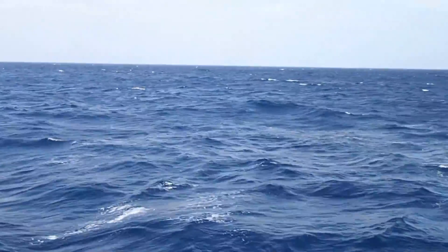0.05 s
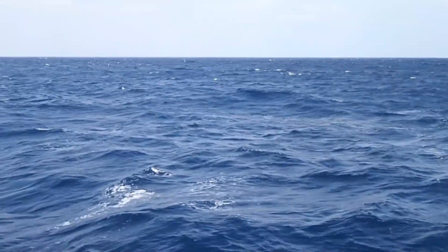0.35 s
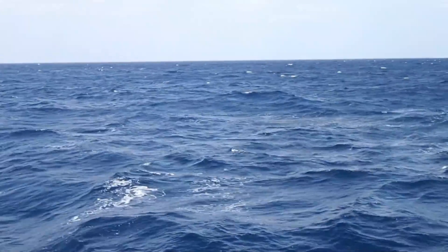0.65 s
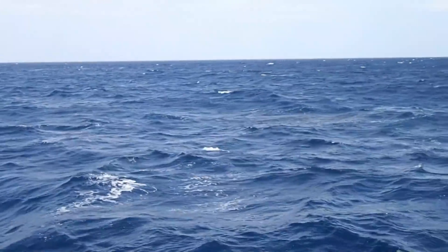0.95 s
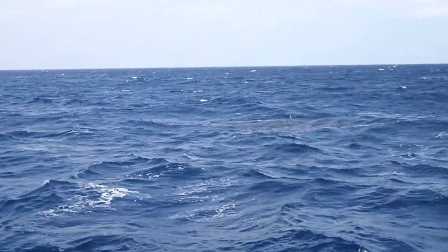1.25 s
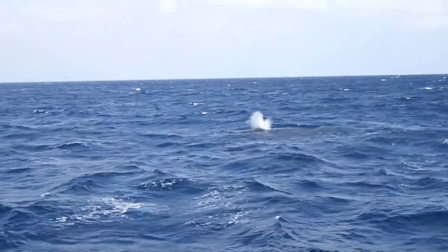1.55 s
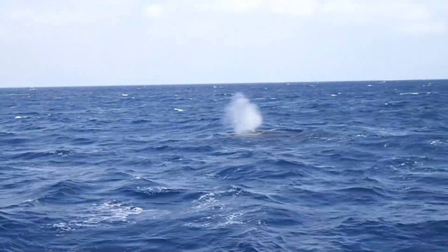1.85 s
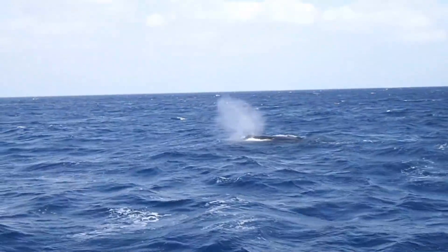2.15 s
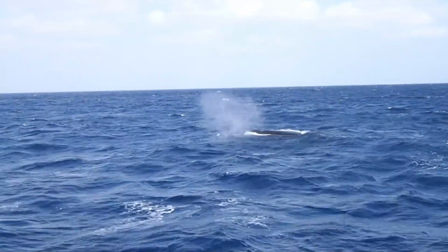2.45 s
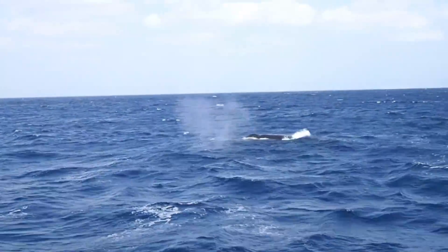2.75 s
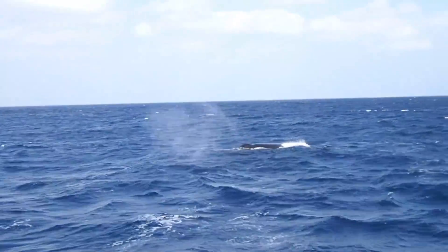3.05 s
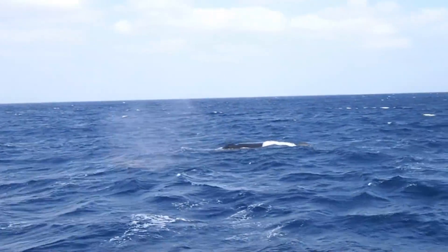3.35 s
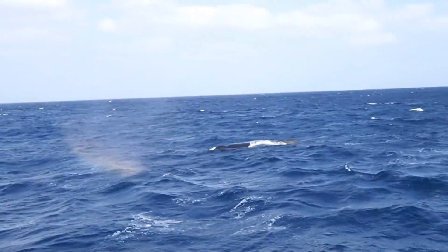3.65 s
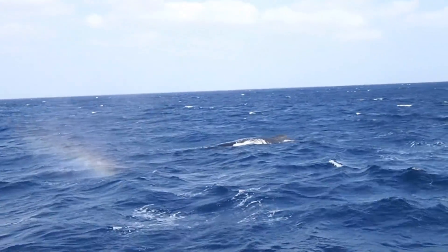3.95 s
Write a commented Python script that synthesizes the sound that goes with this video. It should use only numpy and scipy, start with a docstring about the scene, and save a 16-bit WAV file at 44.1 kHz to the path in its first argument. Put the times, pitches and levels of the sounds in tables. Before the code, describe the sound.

Gusty wind buffets the microphone on a boat at sea. Foam hisses close by in fading surges over a faint engine rumble, and near the middle a whale blows once, some way off, with a breathy whoosh.

```python
"""Wind and a whale from the deck

On a boat in open sea, wind buffets the two microphone ports, each in its own way, over a faint engine.
Close by, foam hisses beside the hull in dying surges; some way off, a whale blows once.
The microphone housing makes the hiss ring near 5 kHz, and a limiter ducks everything
at the hardest buffets."""
import sys
import numpy as np
from scipy import signal
from scipy.fft import rfft, irfft
from scipy.io import wavfile
from scipy.ndimage import uniform_filter1d, minimum_filter1d

SR = 44100
rng = np.random.default_rng(int(sys.argv[2]) if len(sys.argv) > 2 else 0)


def generate_wav(signal):
    """Clip the signal to [-1, 1] and save it as 16-bit WAV at the path in sys.argv[1]."""
    frames = np.transpose(np.atleast_2d(signal))
    scaled = np.clip(frames, -1, 1) * 32767
    pcm = np.round(scaled).astype(np.int16)
    wavfile.write(sys.argv[1], SR, pcm)


N = 176400

# wind strength at each microphone port: (time [s], level [dB, before GUST_DEPTH and band steepness])
GUST_LEFT = [(0.0, -5), (0.14, 0), (0.28, -2.5), (0.39, 3), (0.58, -16.5), (0.61, 0), (0.76, -3),
             (0.81, -4.5), (1.0, 3), (1.05, -3.5), (1.13, 4.5), (1.18, -3), (1.43, 0.5), (1.55, -2.5),
             (1.79, -0.5), (1.88, -7), (2.13, 3), (2.26, -0.5), (2.42, 1.2), (2.55, -2.8), (3.08, 0),
             (3.47, -4), (3.5, -9), (3.67, -2), (3.73, -6.5), (4.0, -2.2)]
GUST_RIGHT = [(0.0, 0), (0.2, -9), (0.23, 4.5), (0.58, -7), (0.76, 6), (0.88, -2.5), (0.93, 2),
              (1.45, -4.2), (1.5, 3.5), (1.63, -2), (1.81, 2.3), (1.89, -4), (2.0, 4), (2.15, 4), (2.2, 0),
              (2.5, 0), (2.66, -1), (2.71, 2.2), (2.88, -4), (3.08, 3.5), (3.16, -6.5), (3.38, 2.5),
              (3.49, -2.5), (3.8, -1.2), (3.84, -5), (4.0, -7)]
# turbulence on a port, before gusts and port gain: (frequency [Hz], density [dB per Hz])
WIND_SPECTRUM = [(20, -71), (30, -67), (55, -50), (100, -42.5), (170, -40.5), (300, -47), (500, -57),
                 (800, -68), (1400, -86.5), (3000, -112), (8000, -135)]
GUST_DEPTH, STEEPEN_PER_OCTAVE = 0.86, 0.44   # higher bands follow the gusts more steeply
EDDY_PER_S, EDDY_DEPTH, FLUTTER_PER_S, FLUTTER_DB = 28, 1.99, 15, 1.0

# surges of foam beside the hull, and swells of the engine under the deck: (time [s], level [dB])
WASH_LEVEL = [(0, 0.5), (.06, 3), (.14, 3), (.33, -1.9), (.46, -8.5), (.57, -5.5), (.66, -.5), (.74, -1),
              (.82, -9), (.99, -2.5), (1.22, -12), (1.53, -13.5), (2.28, -15), (2.55, -31), (2.68, -10.5),
              (2.83, -10), (3.1, -18), (3.28, -16), (3.48, -22), (3.66, -14.5), (4, -14.5)]
ENGINE_LEVEL = [(0, 6), (.9, -2), (1.4, -5), (1.7, -14), (2.05, 3), (2.8, 3.5), (3.25, -4), (3.9, 7)]
FOAM_GRAIN_DB, FOAM_GRAINS_PER_S = 1.44, 140
DROPS_PER_S, DROP_SPREAD_DB, DROP_DB = 500, 2, -11

# base spectra of foam, sea, engine and whale spray, ahead of the housing:
# (frequency [Hz], density [dB per Hz])
FOAM_SPECTRUM = [(200, -70), (600, -68.5), (1100, -69), (1550, -71.5), (2000, -75.5), (2700, -84.5),
                 (4000, -89), (9000, -87), (11000, -92), (15500, -93)]
SEA_SPECTRUM = [(200, -67), (600, -71.5), (1100, -80.5), (1550, -82), (2200, -95), (4000, -102),
                (9000, -108), (12000, -110), (15500, -110)]
ENGINE_SPECTRUM = [(20, -72), (40, -59.5), (53, -50), (68, -72), (110, -55), (250, -64.5), (600, -82),
                   (2000, -130)]
SPRAY_SPECTRUM = [(600, -71.5), (1500, -75.5), (2200, -85), (3100, -87), (4100, -94), (5400, -89.5),
                  (6600, -92.5), (8200, -90.5), (11000, -95), (15500, -99)]
# how alike each arrives at the two ports: (frequency [Hz], correlation [-1 to 1])
FOAM_LIKENESS = [(500, .97), (2000, 1), (3800, 1), (5300, 0.88), (7000, 0.62), (10000, 0.78), (14000, .5)]
SEA_LIKENESS = [(500, 1), (2000, 1), (3800, 1), (5500, 0.31), (8000, .2), (13000, -0.62)]
ENGINE_LIKENESS = [(30, 0.61), (200, 0.67)]
SPRAY_LIKENESS = [(4000, .997), (8000, 0.94), (14000, 1)]

# hard eddies striking the ports:
# (time [s], level [dB], pitch [Hz], left over right [dB], relative edge level [dB, before EDGE_DB])
BUFFETS = [(.149, -2, 142, 12, -14), (.238, -2.5, 168, -11.5, -14), (0.372, -4, 324, -9, -21),
           (0.403, -7, 400, 18, -4), (0.73, -6.5, 167, 9, -18), (.759, -2.5, 277, -5, -13),
           (.767, -3.5, 240, 2, -18), (.945, -3.5, 315, 15, -15), (1.010, -2, 217, 24, -16),
           (1.121, -15, 241, 12, -10), (1.175, -9.5, 190, -12, -8.5), (1.306, -17.5, 400, -10, -1.5),
           (1.338, -11.5, 228, 0, -9), (1.445, -12, 320, 25, 1), (1.517, -2, 196, 29, -20),
           (1.816, -2, 177, -32, -27), (1.95, -9, 183, 8, -8.5), (2.086, -8, 262, 2, -13),
           (2.137, -2.5, 260, 6, -9), (2.235, -2, 214, 18, -9), (2.366, -9, 202, 1, -12),
           (2.490, -12, 454, -10, -6), (2.653, -15, 330, 9, -3), (2.680, -5, 192, 10, -13.5),
           (2.853, -13, 170, -21, -11), (2.865, -2, 185, 25, -14), (2.979, -5, 170, 6.5, -26),
           (3.019, -7, 328, 10, -9.5), (3.085, -3.5, 337, 20, -10), (3.244, -14, 304, 6, -13),
           (3.388, -16, 228, -20, -22), (3.416, -10, 285, 12, -3.5), (3.457, -2, 198, 18, -22),
           (3.465, -1, 200, 24, -13), (3.587, -6, 293, 14, -12), (3.628, -11.5, 206, 19, -9),
           (3.668, -12.5, 260, 5, -4.5), (3.770, -1, 154, 15, -16), (3.922, -8, 148, 16, -20)]
BUFFET_DECAY_CYCLES, EDGE_DB, EDGE_WIDTH_S = 0.54, -6, 0.00027
# fast gusts across the ports: (time [s], half length [s], level [dB], pitch [Hz], left over right [dB])
RUSHES = [(0.419, 0.033, -22.5, 391, 2), (0.764, 0.014, -16.5, 332.5, -7), (2.08, 0.1, -25, 310.5, -2.5),
          (3.29, 0.017, -21, 349.5, 2)]

# the whale, some way off: spray, a hollow roar from the blowhole, a bright jet at the crest
BLOW_CREST_S, BLOW_ATTACK_S, SPRAY_FALL_DB_PER_S = 1.79, 0.1, 24
ROAR_HZ, ROAR_WIDTH_HZ, ROAR_SAG_HZ_PER_S, ROAR_DB, ROAR_FALL_DB_PER_S = 1259, 125, 700, -43, 17.5
JET_HZ, JET_WIDTH_HZ, JET_DB, JET_S = 7940, 600, -54.5, 0.03

# small spits of spray at the microphone: (time [s], level [dB])
SPITS = [(2.961, -37.5), (3.257, -42.5)]
SPIT_S, SPIT_HZ, SPIT_WIDTH_HZ = .004, 5500, 330

# resonances and dips of the microphone housing: (frequency [Hz], half width [Hz], gain [dB])
HOUSING_RESONANCES = [(1880, 72, -10), (2200, 150, 3), (3050, 155, 4.5), (3650, 80, 4), (4590, 173, 6),
                      (4780, 82, -14), (5300, 780, 20.5), (6456, 856, 11), (7890, 760, 10.5)]
CEILING, RELEASE_DB_PER_S, LOOKAHEAD_S, CUTOFF_HZ = 0.48, 47.5, 0.0011, 15700

TIME_S = np.arange(N) / SR
BIN_HZ = np.maximum(np.arange(N // 2 + 1) * SR / N, 1)


def from_db(db):
    """Decibels to gain."""
    return 10 ** (np.asarray(db) / 20)


def in_time(rows):
    """A time table at every sample."""
    return np.interp(TIME_S, *np.transpose(rows))


def at_hz(rows):
    """A frequency table at every bin, on a log axis."""
    hz, value = np.transpose(rows)
    return np.interp(np.log(BIN_HZ), np.log(hz), value)


def colour(white, spectrum):
    """Gives unit white noise a spectrum in dB per Hz."""
    return irfft(rfft(white) * from_db(at_hz(spectrum)) * np.sqrt(SR / 2), N)


def drift(rate_hz):
    """A random wander with spread 1, mostly slower than the given rate."""
    slow = irfft(rfft(rng.standard_normal(N)) / (1 + (BIN_HZ / rate_hz) ** 2), N)
    return slow / slow.std()


def narrow_noise(hz, width_hz):
    """A hollow band of noise around a pitch that may glide; rms 1."""
    phase = 2 * np.pi * np.cumsum(hz * np.ones(N)) / SR
    return drift(width_hz) * np.cos(phase) + drift(width_hz) * np.sin(phase)


def pan(left_db):
    """Left and right gains; the nearer side stays at 1."""
    return from_db(np.minimum([[left_db], [-left_db]], 0))


def spread(pair, likeness):
    """Mixes two unrelated signals into two channels with a given likeness."""
    alike = np.clip(at_hz(likeness), -.9, .998)
    mid, side = rfft(pair) * np.sqrt([(1 + alike) / 2, (1 - alike) / 2])
    return irfft([mid + side, mid - side], N)


def hiss(likeness):
    """White noise arriving through the air at both ports."""
    return spread(rng.standard_normal((2, N)), likeness)


def wind(gusts, port_db):
    """Turbulence right on one port, in octave bands: gusts and quick eddies make it louder and brighter."""
    flow_db = GUST_DEPTH * in_time(gusts) + EDDY_DEPTH * drift(EDDY_PER_S)
    turbulence = rfft(colour(rng.standard_normal(N), WIND_SPECTRUM))
    bin_octave = np.clip(np.log2(BIN_HZ / 250), -3, 3)
    out = 0
    for octave in range(-3, 4):
        band = irfft(turbulence * np.maximum(1 - abs(bin_octave - octave), 0), N)
        steepness = max(1 + STEEPEN_PER_OCTAVE * octave, 0)
        out += band * from_db(steepness * flow_db + FLUTTER_DB * drift(FLUTTER_PER_S))
    return from_db(port_db) * out


def foam_wash():
    """Foam bursts close beside the hull: a grainy hiss with single droplets, swelling with each wave."""
    sizes = from_db(DROP_SPREAD_DB * np.minimum(rng.exponential(1, (2, N)), 5))
    signs = rng.choice([-1, 1], (2, N))
    drops = sizes * signs * (rng.random((2, N)) < DROPS_PER_S / SR)
    fizz = hiss(FOAM_LIKENESS) * from_db(FOAM_GRAIN_DB * drift(FOAM_GRAINS_PER_S))
    droplets = from_db(DROP_DB) * spread(drops / drops.std(), FOAM_LIKENESS)
    return colour(fizz + droplets, FOAM_SPECTRUM) * from_db(in_time(WASH_LEVEL))


def open_sea():
    """The steady hush of the water around the boat."""
    return colour(hiss(SEA_LIKENESS), SEA_SPECTRUM)


def engine_rumble():
    """The engine comes up through the deck as a deep noise that swells and fades."""
    return colour(hiss(ENGINE_LIKENESS), ENGINE_SPECTRUM) * from_db(in_time(ENGINE_LEVEL))


def buffets():
    """Each hard eddy hits the microphone as a brief swing of pressure with a sharp edge in its middle."""
    out = np.zeros((2, N))
    signs = rng.choice([-1, 1], len(BUFFETS))
    for (at_s, db, hz, pan_db, edge_db), sign in zip(BUFFETS, signs):
        near = abs(TIME_S - at_s) < .04
        age = TIME_S[near] - at_s
        cycles, widths = age * hz, age / EDGE_WIDTH_S
        swing = np.sin(2 * np.pi * cycles) / np.cosh(2 * cycles / BUFFET_DECAY_CYCLES)
        edge = from_db(edge_db + EDGE_DB) * (1 - widths ** 2) * np.exp(-widths ** 2 / 2)
        out[:, near] += sign * from_db(db) * pan(pan_db) * (swing + edge)
    return out


def rushes():
    """Fast gusts blow across the ports with a short, hollow rush."""
    out = np.zeros((2, N))
    for at_s, half_s, db, hz, pan_db in RUSHES:
        pair = np.array([narrow_noise(hz, width_hz=128) for port in range(2)])
        swell = np.exp(-((TIME_S - at_s) / half_s) ** 2 / 2)
        out += pair * pan(pan_db) * from_db(db) * swell
    return signal.sosfilt(signal.butter(2, [150, 1200], "band", fs=SR, output="sos"), out)


def whale_blow():
    """Some way off, the blow swells to a bright crest; its roar sinks in pitch and outlasts the spray."""
    age = TIME_S - BLOW_CREST_S
    swell = np.exp(-(np.minimum(age, 0) / BLOW_ATTACK_S) ** 2 / 2)
    after_s = np.maximum(age, 0)
    spray = colour(hiss(SPRAY_LIKENESS), SPRAY_SPECTRUM) * from_db(-SPRAY_FALL_DB_PER_S * after_s)
    roar_hz = ROAR_HZ - ROAR_SAG_HZ_PER_S * np.clip(age, -.5, .5)
    roar = narrow_noise(roar_hz, ROAR_WIDTH_HZ) * from_db(ROAR_DB - ROAR_FALL_DB_PER_S * after_s)
    jet = narrow_noise(JET_HZ, JET_WIDTH_HZ) * from_db(JET_DB) * np.exp(-(age / JET_S) ** 2 / 2)
    return swell * spray + swell ** 2 * roar + jet


def spits():
    """Small spits of spray ring briefly in the housing's main resonance."""
    bursts = sum(from_db(db) * np.exp(-((TIME_S - at_s) / SPIT_S) ** 2) for at_s, db in SPITS)
    return narrow_noise(SPIT_HZ, SPIT_WIDTH_HZ) * bursts


def housing(airborne):
    """The cavity in front of the microphone colours airborne sound."""
    shape_db = sum(db * np.exp(-((BIN_HZ - hz) / width) ** 2) for hz, width, db in HOUSING_RESONANCES)
    return irfft(rfft(airborne) * from_db(shape_db), N)


def scene():
    """From the deck: engine, water and whale come through the air; the wind is right on the ports."""
    airborne = engine_rumble() + foam_wash() + whale_blow() + open_sea()
    port_wind = np.array([wind(GUST_LEFT, port_db=1.57), wind(GUST_RIGHT, port_db=-2.5)])
    housed = (housing(airborne) + spits()) * pan(left_db=0.53)
    return housed + port_wind + rushes() + buffets()


def record(dry):
    """In the recorder, one limiter ducks both channels, then a steep filter cuts the top."""
    over_db = 20 * np.log10(np.maximum(abs(dry).max(axis=0) / CEILING, 1))
    release_db = RELEASE_DB_PER_S * TIME_S
    held_db = np.maximum.accumulate(over_db + release_db) - release_db
    ahead = int(LOOKAHEAD_S * SR)
    gain_db = uniform_filter1d(minimum_filter1d(-held_db, 2 * ahead), ahead)   # ducks ahead of the peak
    top_cut = signal.ellip(12, .1, 90, CUTOFF_HZ, fs=SR, output="sos")
    return signal.sosfilt(top_cut, dry * from_db(gain_db))


dry = scene()
out = record(dry)
generate_wav(out)
```